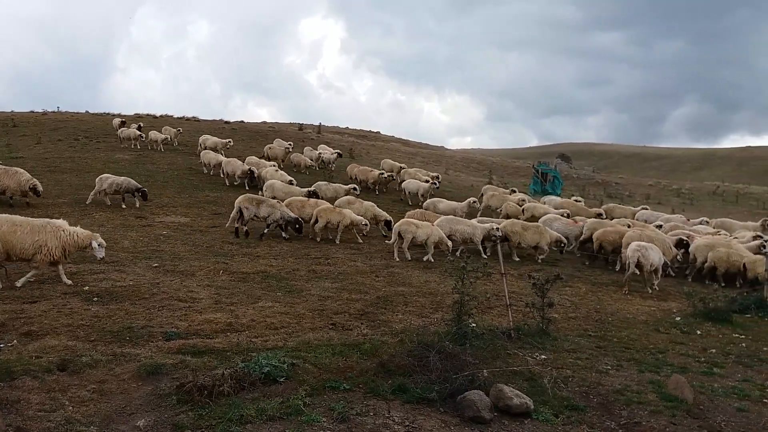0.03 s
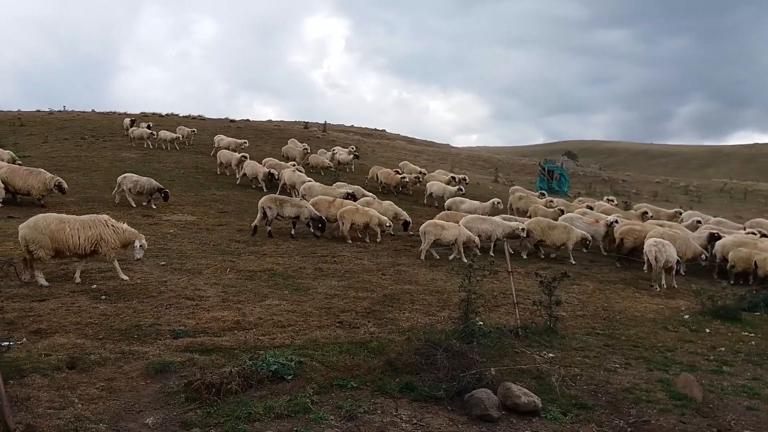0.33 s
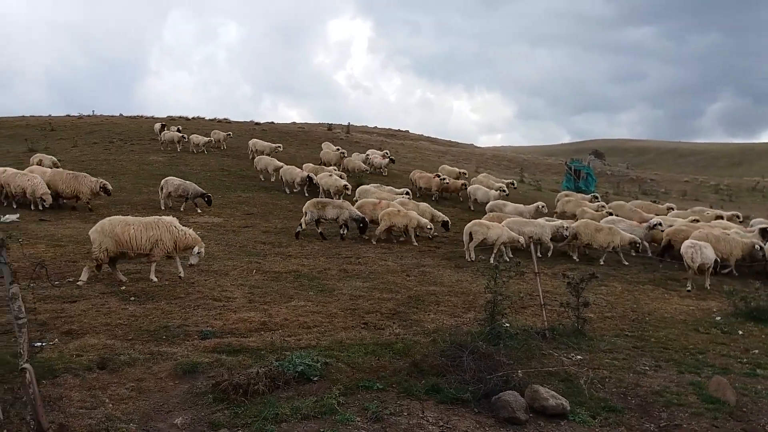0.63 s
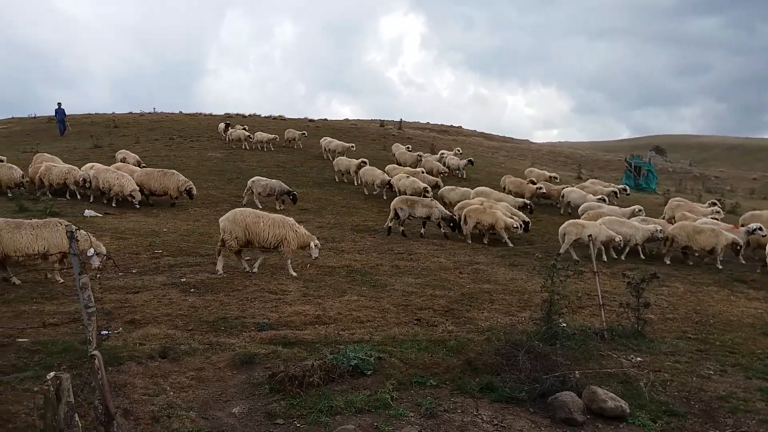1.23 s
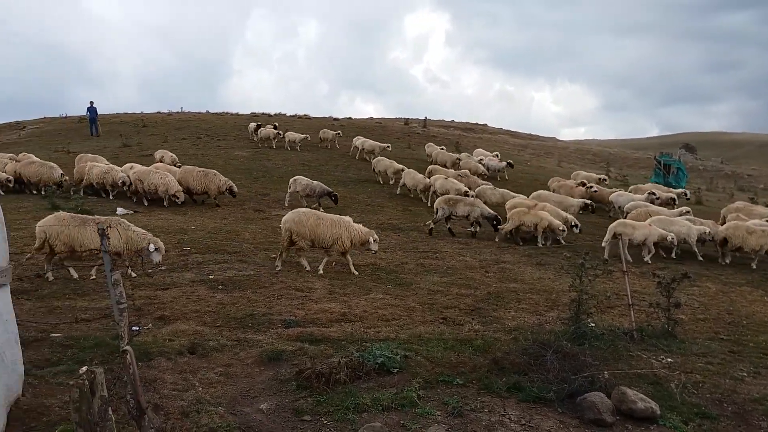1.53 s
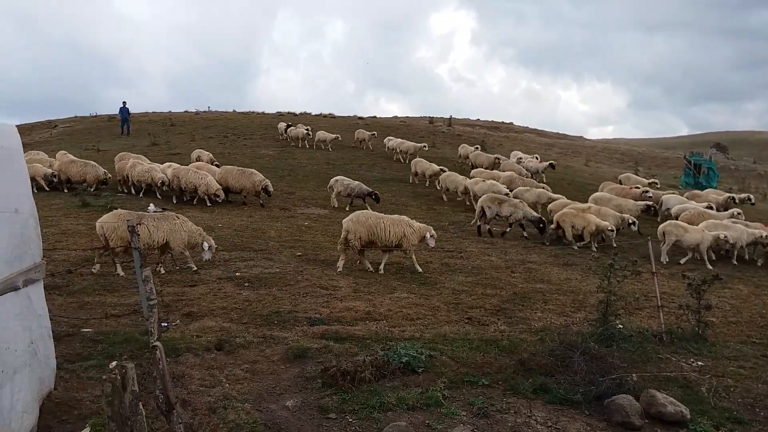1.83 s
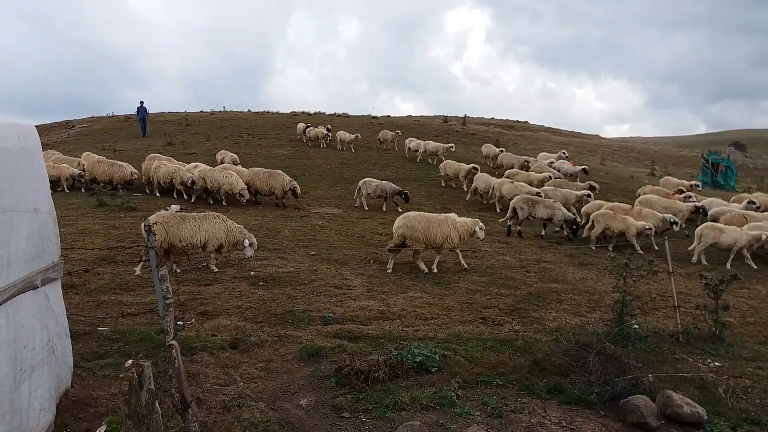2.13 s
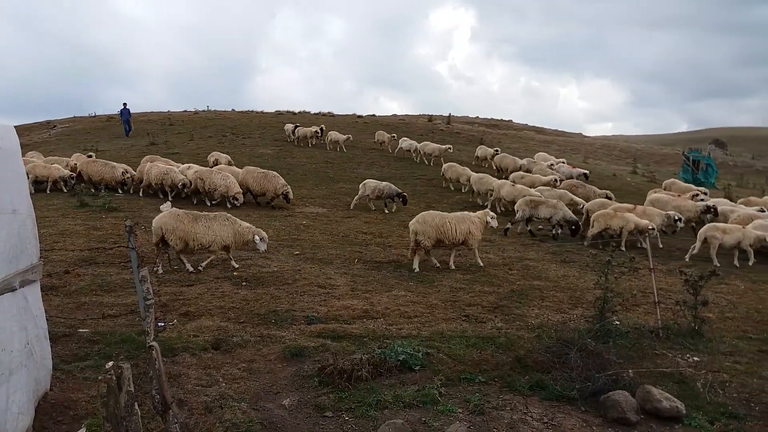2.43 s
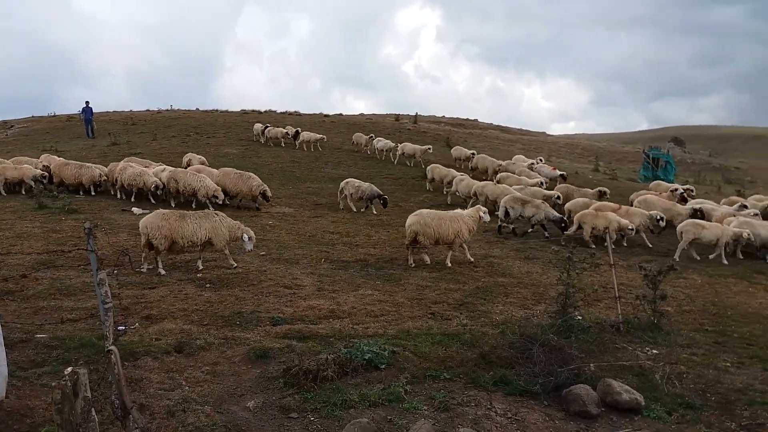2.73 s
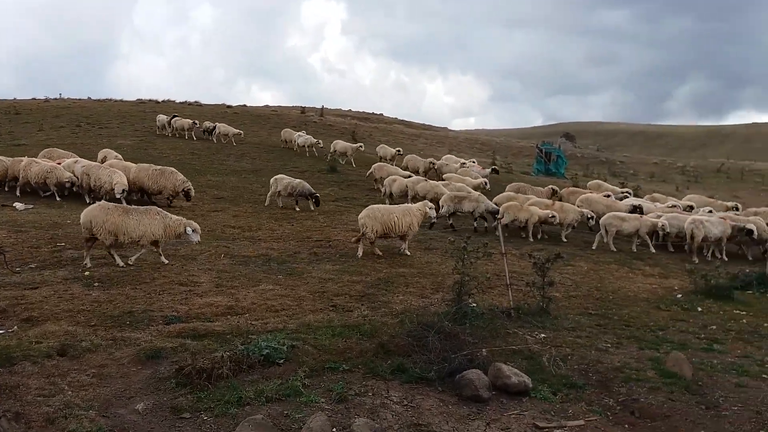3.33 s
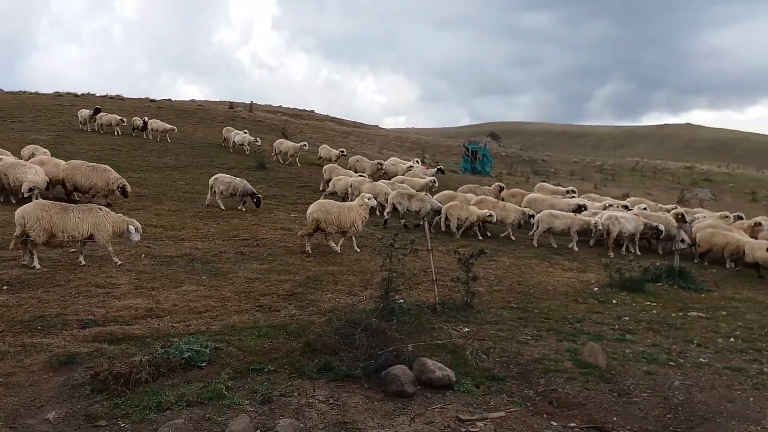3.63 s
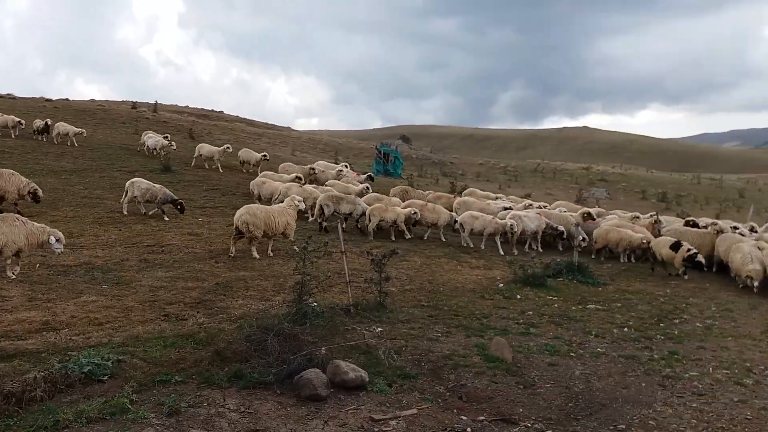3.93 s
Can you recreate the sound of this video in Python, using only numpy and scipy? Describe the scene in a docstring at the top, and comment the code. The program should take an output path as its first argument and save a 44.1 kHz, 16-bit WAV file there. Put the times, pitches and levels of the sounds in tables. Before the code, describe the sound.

A flock's metal bells ring unevenly in gusty wind as one sheep bleats loudly.

```python
"""Sheep walk over an open hillside. From the start a soft bell rings under its clapper, others
jingle farther off and wind buffets the microphone. From 0.8 to 1.75 s one sheep gives a loud,
quavering bleat: glottal pulses and breath through its throat. From 1.4 s a near sheet-metal bell
clanks in step with its wearer. From 2.8 s a few dry stalks snap."""
import sys
import numpy as np
from scipy import signal
from scipy.fft import rfft, irfft, next_fast_len
from scipy.io import wavfile
from scipy.ndimage import uniform_filter1d, map_coordinates

SR = 44100
rng = np.random.default_rng(int(sys.argv[2]) if len(sys.argv) > 2 else 0)


def unload_audio(sound):
    """Save the sound as a 16-bit wav file, at the path given as the first command line argument."""
    columns = np.transpose(np.atleast_2d(sound))
    # keep every value between -1 and 1, then stretch to whole-number steps
    steps = np.round(np.clip(columns, -1, 1) * 32767)
    wavfile.write(sys.argv[1], SR, steps.astype(np.int16))


N = 176400


def amp(db):
    """Decibels to gain."""
    return 10 ** (np.asarray(db) / 20)


def unit(x):
    """Scale to rms 1."""
    return x / np.sqrt(np.mean(x ** 2) + 1e-20)


def curve(rows):
    """One value per sample from (t/s, value) points."""
    return np.interp(np.arange(N) / SR, *np.transpose(rows))


def wobble(knots_per_s):
    """Smooth random curve."""
    return map_coordinates(rng.standard_normal(2000), [np.arange(N) * knots_per_s / SR], mode="wrap")


def colour(x, points):
    """Minimum-phase filter through (f/Hz, level/dB) points."""
    size = 2 * next_fast_len(N // 2 + SR // 4)
    hz, db = np.transpose(points)
    gain = amp(np.interp(np.log(np.fft.rfftfreq(size, 1 / SR) + 1), np.log(hz), db))
    cepstrum = irfft(np.log(gain), size)
    cepstrum[1:size // 2] *= 2
    cepstrum[size // 2 + 1:] = 0
    return irfft(rfft(x, size) * np.exp(rfft(cepstrum)), size)[:N]


def noise(points):
    """Coloured noise, rms 1."""
    return unit(colour(rng.standard_normal(N), points))


def bell(modes, blows, splits_hz, rise_cycles, sway_db, sway_per_s, clack_db, clack_t60_s):
    """Each clapper blow stops the old ring and starts a new one; the swing makes every mode waver."""
    t, out = np.arange(N) / SR, np.zeros(N)
    blows = np.array(blows)
    latest = np.maximum(np.searchsorted(blows[:, 0], t, side="right") - 1, 0)
    age_s = np.abs(t - blows[latest, 0])
    begun = t >= blows[0, 0]
    for hz, db, t60_s in modes:
        group = np.searchsorted(splits_hz, hz)
        overtone = group == len(splits_hz)
        scatter, phase = overtone * rng.standard_normal((2, 64))  # overtones vary per blow
        level_db = blows[latest, 1 + group] + db + 2.85 * scatter[latest] - 60 * age_s / t60_s
        decay = begun * amp(level_db) * np.exp(1j * phase[latest])
        pole = np.exp(-hz / SR / rise_cycles)
        envelope = signal.lfilter([1 - pole], [1, -pole], decay)
        sway = amp(sway_db * wobble(sway_per_s))
        carrier = np.exp(2j * np.pi * hz * t + .15j * wobble(25))
        out += sway * np.real(envelope * carrier)
    clack = noise([(300, -8), (900, -2), (4000, 7), (6500, -6.5), (10000, -15), (16000, -15)])
    return out + clack * begun * amp(blows[latest, -1] + clack_db - 60 * age_s / clack_t60_s)


# Modes: f/Hz, level/dB, t60/s
SOFT_MODES = [(866.6, 1.5, 1.3), (2038, -5.5, .8), (2169, -1.5, 1.2), (3770, -13.5, 0.82), (3849, -3, 0.91),
              (4080, -5.5, 0.84), (4140, -9, .5), (4340, -5.5, 0.55), (4520, -12, 0.75),
              (6000, -15.5, 0.57), (6210, -17, 0.42), (7430, -20, .35), (8600, -30, .35)]
# Clapper blows: t/s, main note/dB, upper pair/dB, overtones/dB
SOFT_BLOWS = [(0.0, -62, -51, -67), (.048, -42.5, -64, -55), (.2, -40, -68, -54), (.308, -39.5, -55.5, -50),
              (0.384, -41, -51, -63), (.51, -41, -49, -59), (0.672, -41.5, -55.5, -47.5),
              (.935, -43.5, -57, -56), (1.33, -38, -42, -47.5), (1.6, -42, -57, -52.5),
              (2.08, -50, -67, -69), (2.36, -58, -78, -74), (2.66, -50.5, -64, -69),
              (3.022, -38.5, -54, -63), (3.21, -42, -62, -71), (3.465, -55, -58.5, -63.5),
              (3.6, -43.5, -61, -73), (3.838, -37.5, -58.5, -53), (3.9, -38, -68, -59.5)]


def soft_bell():
    """Light clapper blows, long ring."""
    return bell(SOFT_MODES, SOFT_BLOWS, splits_hz=[1300, 2600], rise_cycles=7.4,
                sway_db=3.0, sway_per_s=22, clack_db=-14, clack_t60_s=0.044)


# Modes: f/Hz, level/dB, t60/s
FAR_MODES = [(834.5, 3.5, 0.59), (858.6, 3.5, 0.74), (1966, -16.5, 0.63), (2137, -10.5, 0.45),
             (3671, -7.5, 0.47), (3860, -15, 0.28), (4270, -16, .5), (4420, -18, 0.33), (4580, -13.5, 0.43),
             (5470, -33, .5), (5930, -26, 0.46), (6290, -19, 0.21), (7600, -27, 0.23), (8200, -19, 0.21),
             (8750, -33, .3)]


def far_bells(jogs_per_s=9, gain_db=-49):
    """Farther bells, each mode jogged at random and left to ring."""
    t, out = np.arange(N) / SR, np.zeros(N)
    for hz, db, t60_s in FAR_MODES:
        jogs = (rng.random(N) < jogs_per_s / SR) * np.exp(2j * np.pi * rng.random(N))
        jogs[0] = 1
        decay = signal.lfilter([1], [1, -amp(-60 / t60_s / SR)], jogs)
        envelope = uniform_filter1d(decay, int(3 * SR / hz) + 1)  # 3-cycle rise
        out += np.real(envelope * np.exp(2j * np.pi * hz * t)) * amp(db)
    return amp(gain_db) * out


# Gusts: t/s, 1/e half-width/s, level/dB
GUSTS = [(.1, 0.017, -44), (0.536, 0.033, -29.5), (.68, 0.064, -38), (0.923, 0.057, -36.5),
         (1.163, 0.021, -36.5), (1.332, 0.046, -35), (1.482, 0.045, -36.5), (1.657, 0.082, -36.5),
         (1.86, 0.027, -46), (2.107, 0.067, -38.5), (2.206, 0.033, -36.5), (2.293, 0.034, -31.5),
         (2.498, 0.054, -33), (2.679, 0.078, -37), (2.877, 0.046, -36), (3.038, 0.013, -30.5),
         (3.155, 0.05, -34), (3.332, 0.051, -25.5), (3.637, 0.029, -29.5), (3.749, 0.02, -35.5),
         (3.851, 0.018, -28)]
# Noise spectra: f/Hz, level/dB
EDDY_SPECTRUM = [(20, -27), (35, -28), (60, 0), (120, 3.5), (190, -3.5), (300, -15), (450, -30), (700, -40),
                 (1500, -61.5), (4000, -77)]
RUMBLE_SPECTRUM = [(20, -41), (35, -31.5), (58, -3), (90, 0), (130, -2), (200, -13.5), (320, -24.5),
                   (500, -35), (1000, -51), (3000, -92)]
AIR_SPECTRUM = [(100, 1), (500, 1), (1100, -3.5), (2600, -6), (4300, -6), (5500, -14), (7000, -22.5),
                (10000, -22), (16000, -20)]


def wind(rumble_db=-45, gust_db=-1.5, air_db=-62):
    """Wind on the microphone: lumpy rumble, short brighter gusts, faint hiss of open air."""
    t = np.arange(N) / SR
    gusts = sum(amp(db) * np.exp(-((t - at_s) / width_s) ** 2) for at_s, width_s, db in GUSTS)
    eddies = noise(EDDY_SPECTRUM)
    local_power = np.abs(uniform_filter1d(eddies ** 2, size=1800))
    even_eddies = eddies / np.sqrt(local_power + .02)
    rumble = noise(RUMBLE_SPECTRUM) * amp(rumble_db + 2.4 * wobble(19))
    air = amp(air_db + .7 * wobble(3.2)) * noise(AIR_SPECTRUM)
    return rumble + amp(gust_db) * gusts * even_eddies + air


def glottis(cycles, breath_share, jitter_s=0.00015, shimmer_db=1):
    """One sharp pulse per cycle, uneven in level; timing loosens with breathiness."""
    onsets = np.interp(np.arange(1, int(cycles[-1]) - 1), cycles, np.arange(N))
    jitter, shimmer = rng.standard_normal((1000, 2))[:len(onsets)].T
    onsets += jitter * jitter_s * SR * np.sqrt(breath_share[onsets.astype(int)])
    taps = onsets.astype(int)[:, None] + np.arange(-7, 9)
    offset = taps - onsets[:, None]
    shapes = np.sinc(offset) * np.cos(np.pi * offset / 16) ** 2
    shapes *= amp(-shimmer_db * shimmer[:, None])
    pulses = np.bincount(taps.ravel(), shapes.ravel(), N)[:N]
    return unit(pulses - pulses.mean())


# Voice pitch: t/s, f/Hz
PITCH = [(.8, 148.9), (.9, 158.7), (.99, 167), (1.046, 164.2), (1.074, 171.8), (1.112, 172.8),
         (1.152, 171.2), (1.186, 161), (1.21, 167.4), (1.298, 166), (1.325, 161.2), (1.352, 163.2),
         (1.376, 154.3), (1.404, 164.7), (1.456, 165), (1.562, 165.6), (1.592, 152.3), (1.638, 159.5),
         (1.666, 156.5), (1.71, 145.4), (1.75, 138.4)]
# Roughness: t/s, breath share/0-1
BREATH_SHARE = [(.8, 0.7), (.97, 0.36), (1.0, 0.12), (1.08, 0), (1.16, 0), (1.19, 0.1), (1.23, 0),
                (1.31, 0), (1.38, 0.13), (1.45, 0), (1.56, 0.05), (1.6, 0.14), (1.65, 0.01), (1.75, 0.06)]
# Throat response, early and late vowel: f/Hz, level/dB
THROAT_EARLY = [(100, -17), (165, -10), (335, -10.5), (500, -21.5), (680, -2), (850, -1.5), (1050, -11.5),
                (1350, -0.5), (1550, -4), (1780, -11), (2000, -4), (2200, 8), (2420, -7.5), (2700, 2),
                (3100, -19.5), (3700, -21), (4400, -13), (5000, -28.5), (5800, -23.5), (6800, -38),
                (8200, -40.5), (10500, -55), (15000, -56)]
THROAT_LATE = [(100, -29), (165, -8.5), (330, -12.5), (490, -15.5), (660, -0.5), (830, -8.5), (1050, -11),
               (1300, -5), (1480, 1.5), (1750, -8.5), (2000, -18), (2250, 6.5), (2460, -8), (2780, 1.5),
               (3150, -19), (3700, -21.5), (4400, -14), (5000, -28), (5800, -23.5), (6800, -37.5),
               (8200, -38.5), (10500, -53), (15000, -56.5)]
# Treble from the open mouth: t/s, level/dB
MOUTH_TREBLE = [(.9, -2.5), (1.0, -1), (1.15, 2.5), (1.3, 6.5), (1.5, 0.5), (1.6, -3), (1.75, -4.5)]
# Vocal effort: t/s, level/dB
EFFORT = [(.78, -66), (.825, -53.5), (.86, -57), (.905, -48.5), (.984, -47), (.99, -30), (1.05, -31.5),
          (1.11, -28), (1.155, -29.5), (1.186, -31.5), (1.22, -30.5), (1.35, -33.5), (1.376, -37),
          (1.41, -32), (1.55, -32), (1.592, -35), (1.64, -32), (1.747, -40), (1.76, -75)]


def bleat(vowel_glide_s=(1.18, 1.37), gain_db=-0.5):
    """Glottal pulses and pulsed breath through the throat; rougher at each dip of the quaver."""
    t = np.arange(N) / SR
    cycles = np.cumsum(curve(PITCH) * (1 + .003 * wobble(60))) / SR
    share = curve(BREATH_SHARE)
    pulses = glottis(cycles, share)
    breath = unit(rng.standard_normal(N) * (np.exp(-3 * (cycles % 1)) + 0.11))
    source = np.sqrt(share) * breath - np.sqrt(1 - share) * pulses
    late = np.interp(t, vowel_glide_s, [0, 1])
    voice = (1 - late) * unit(colour(source, THROAT_EARLY)) + late * unit(colour(source, THROAT_LATE))
    treble = signal.sosfiltfilt(signal.butter(2, 3500, "high", fs=SR, output="sos"), voice)
    voice += (amp(curve(MOUTH_TREBLE)) - 1) * treble
    sounding = (t > EFFORT[0][0]) & (t < EFFORT[-1][0])
    return voice * amp(curve(EFFORT) + gain_db) * sounding


# Modes: f/Hz, level/dB, t60/s
NEAR_MODES = [(715.5, 0.5, 0.91), (826.6, 2.5, 0.31), (1895.5, 2, 0.58), (2036, -5, 0.47),
              (3076, -13, 0.21), (3219, -9.5, 0.45), (3461, -6.5, 0.18), (3697, -7, 0.13), (3795, -1, 0.1),
              (4508, -11.5, 0.17), (4650, -5.5, 0.12), (5380, -27.5, 0.54), (5750, -13, 0.17),
              (6340, -17.5, 0.11), (6800, -26, .15), (8145, -38.5, .2), (8726, -29, .2), (11900, -29, .12)]
# Clapper blows: t/s, hum/dB, main note/dB, upper pair/dB, overtones/dB
NEAR_BLOWS = [(1.384, -51, -47, -36, -39.5), (1.404, -53, -36.5, -31.5, -41.5),
              (1.751, -59, -29.5, -46.5, -51), (1.768, -64.5, -39.5, -46, -45.5),
              (1.903, -58, -31, -43.5, -45.5), (1.921, -62, -35.5, -45, -49.5),
              (2.044, -54, -38.5, -45.5, -53.5), (2.06, -64, -54, -41, -51.5),
              (2.096, -71, -51, -51, -54.5), (2.254, -60, -43, -51.5, -52.5),
              (2.269, -59, -46.5, -60.5, -55.5), (2.482, -51, -25, -45.5, -50), (2.638, -60, -52, -52, -52),
              (2.861, -44, -38, -34.5, -41.5), (2.874, -42, -40.5, -33, -45),
              (2.885, -47, -48.5, -33.5, -47), (3.01, -58, -45.5, -59, -50),
              (3.267, -63, -29.5, -44.5, -52), (3.295, -62, -27, -42.5, -45.5),
              (3.694, -59, -24, -50, -60.5), (3.712, -57, -29.5, -45, -50.5), (3.729, -52, -36, -46.5, -55),
              (3.901, -59, -54, -55, -54.5)]


def near_bell():
    """Sheet metal struck in step with its wearer: hard clack, short ring."""
    return bell(NEAR_MODES, NEAR_BLOWS, splits_hz=[770, 1300, 2600], rise_cycles=4.6,
                sway_db=3.3, sway_per_s=18, clack_db=-2, clack_t60_s=0.051)


# Snaps: t/s, level/dB
SNAPS = [(2.792, -37), (2.761, -49), (3.4, -55), (3.581, -53)]
# Snap spectrum: f/Hz, level/dB
SNAP_SPECTRUM = [(400, -28), (1500, -8), (3000, 6.5), (5000, -6.5), (8000, -17), (15000, -33)]


def stalks(t60_s=0.014, gain_db=6.5):
    """Dry stalks crack, one tiny noise burst each."""
    t, out = np.arange(SR // 20) / SR, np.zeros(N)
    for at_s, db in SNAPS:
        start = round(at_s * SR)
        out[start:start + len(t)] += amp(db + gain_db - 60 * t / t60_s) * rng.standard_normal(len(t))
    return colour(out, SNAP_SPECTRUM)


def hillside(x, t60_s=0.23, scatter_db=-6):
    """Direct sound plus weak scatter from the open slope."""
    t = np.arange(SR // 2) / SR
    tail = rng.standard_normal(len(t)) * amp(-60 * t / t60_s) * (t > .004)
    return x + amp(scatter_db) * signal.fftconvolve(x, tail / np.linalg.norm(tail))[:N]


def scene():
    """Flock on the slope, wind at the microphone; mono."""
    flock = near_bell() + soft_bell() + far_bells() + bleat() + stalks()
    return (hillside(flock) + wind())[None]


def record(dry):
    """Brick-wall low-pass."""
    cutoff_hz = 15800
    size = next_fast_len(N + SR // 2)
    passband = np.fft.rfftfreq(size, 1 / SR) < cutoff_hz
    return irfft(rfft(dry, size) * passband, size)[..., :N]


dry = scene()
out = record(dry)
unload_audio(out)
```